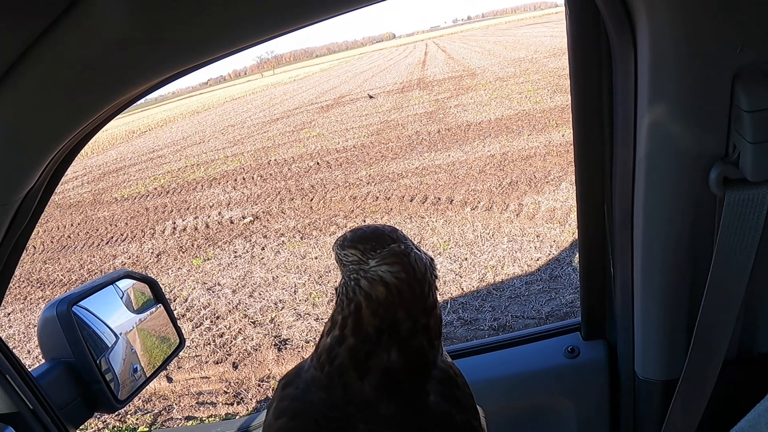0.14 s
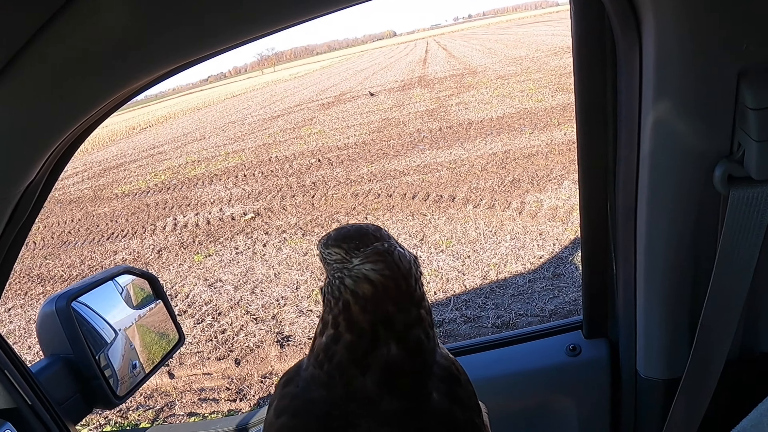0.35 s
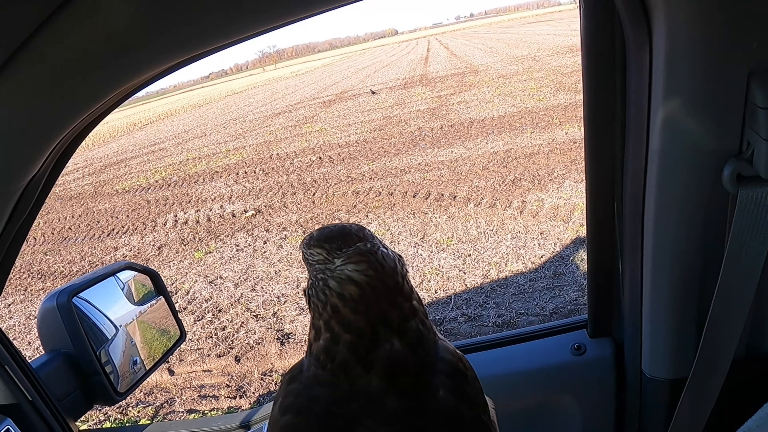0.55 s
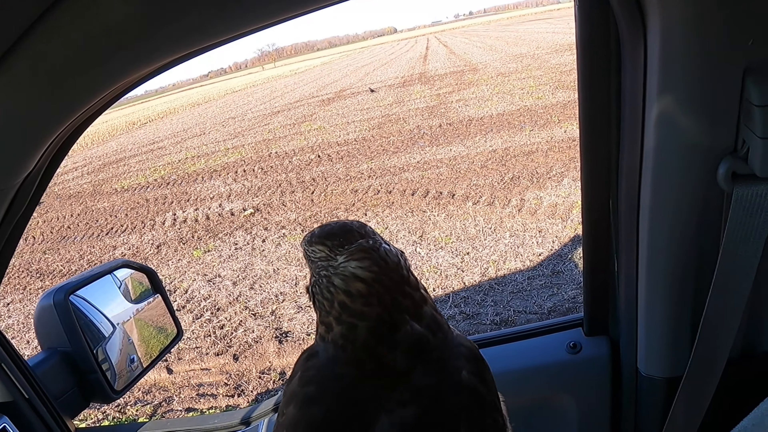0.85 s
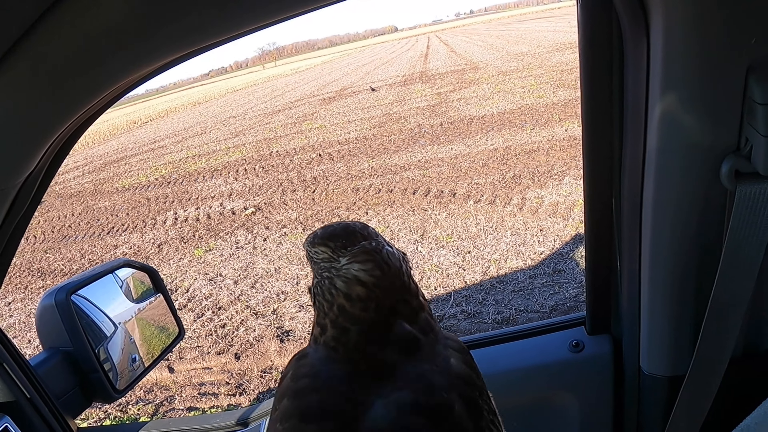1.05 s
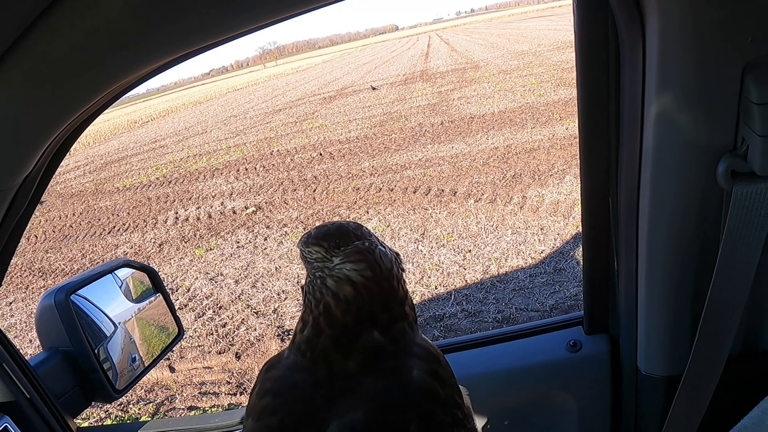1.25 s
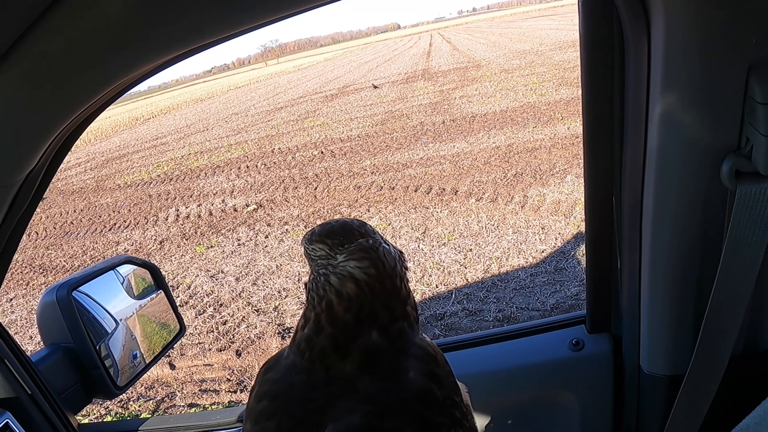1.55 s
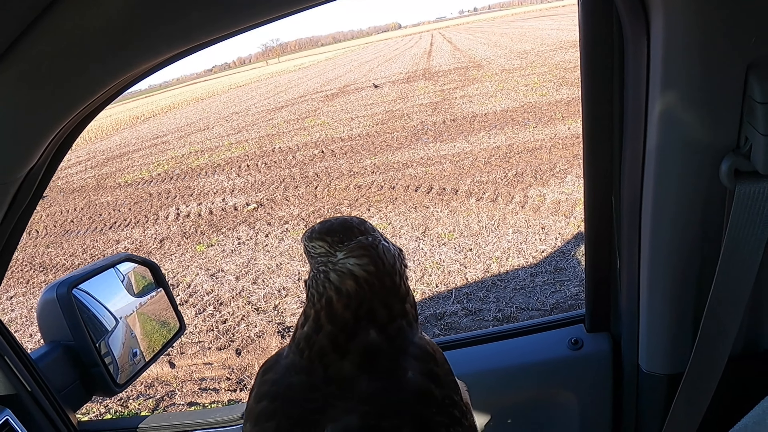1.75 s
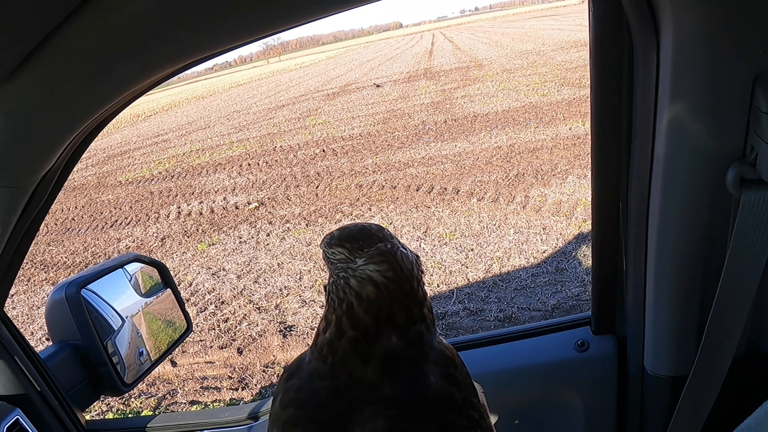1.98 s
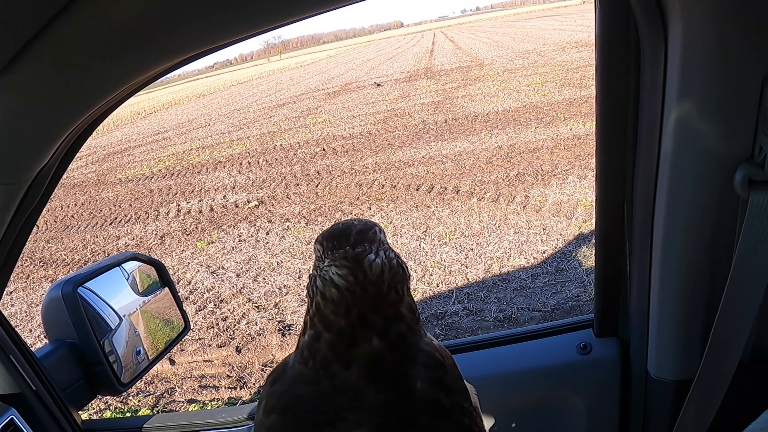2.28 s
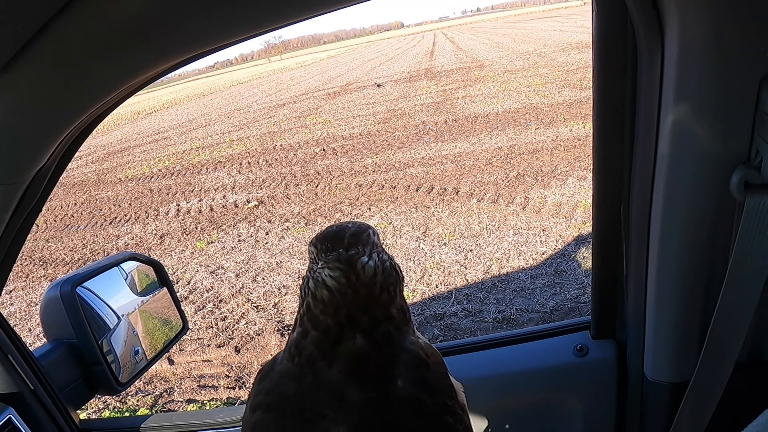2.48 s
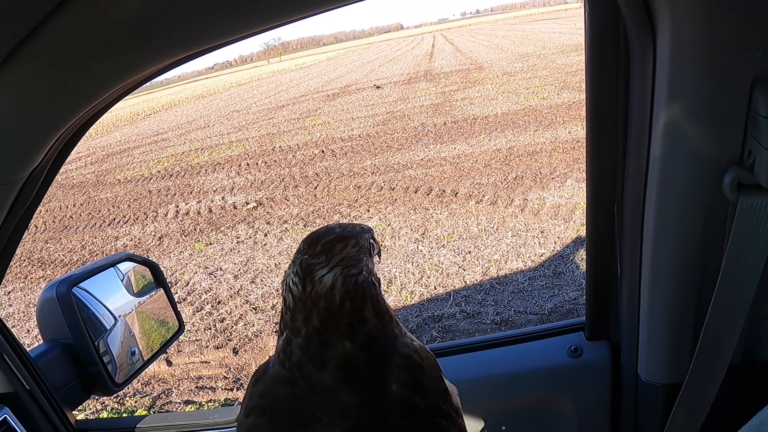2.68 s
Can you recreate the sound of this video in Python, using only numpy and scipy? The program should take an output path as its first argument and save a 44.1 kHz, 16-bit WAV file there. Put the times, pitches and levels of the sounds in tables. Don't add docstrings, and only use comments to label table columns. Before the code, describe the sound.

A small hollow bell on a hawk's leg clatters in uneven clusters as the bird shifts, with feather swishes and tiny snaps, then a sleeve rub; low idling engine rumble in a car, phone microphone close by.

```python
import sys
import numpy as np
from scipy import signal
from scipy.fft import rfft, irfft, next_fast_len
from scipy.io import wavfile
from scipy.ndimage import uniform_filter1d

SR = 44100
rng = np.random.default_rng(int(sys.argv[2]) if len(sys.argv) > 2 else 0)


def elevation(decibels):
    levels = np.asarray(decibels, float)
    return 10 ** (levels / 20)


def store_pcm(level_fs):
    pcm = np.round(np.clip(level_fs, -1, 1) * 32767).astype(np.int16)
    wavfile.write(sys.argv[1], SR, np.atleast_2d(pcm).T)


N = 124362
M = next_fast_len(N)

# pitch_hz, level_db (per Hz)
CABIN = [(12, -39), (20, -2), (65, -12.5), (87, -17.5), (192, -19.5), (304, -26.5), (338, -33.5),
         (700, -44.5), (910, -56), (1540, -120)]
# pitch_hz, level_db (per Hz)
AIR = [(350, -33), (700, 0), (1500, -9), (2600, -12.5), (4200, -22), (7400, -22.5), (9000, -33),
       (12500, -35), (15500, -66)]
# order (multiple of the engine cycle), level_db
ENGINE_ORDERS = [(5, -51.5), (6, -61), (7, -59.5), (8, -45.5), (10, -79.5), (11, -54.5), (13, -42.5),
                 (14, -57), (15, -54.5), (16, -65.5), (19, -55)]
# pitch_hz, width_hz, level_db
TRIM = [(617, 77, -73), (1192, 306, -61.5), (1936, 310, -69)]
# start_s, level_db, pitch_hz
BUMPS = [
    (.68, -33, 44.5),
    (1.42, -40, 35),
    (1.88, -35.5, 30),
    (2.28, -45, 650),
    (2.673, -40, 254),
    (3.1, -43, 130),
    (2.74, -44, 135),
    (2.436, -42, 2400),
]
# time_s, level_db, brightening_db_per_octave
DRAG = [
    (1.68, -52, 0.7),
    (1.81, -49.5, -0.3),
    (1.899, -42.5, -0.8),
    (1.97, -37, -1.1),
    (2.049, -34.5, -0.76),
    (2.15, -38, -0.24),
    (2.2, -40.5, 2.36),
    (2.238, -42.5, 2),
    (2.263, -49, -.5),
    (2.38, -57, -2.5),
]
# pitch_hz, level_db (per Hz)
SLEEVE = [(100, -9), (223, 0), (429, -15), (878, -9), (3760, -15), (7390, -23.5), (12500, -41.5),
          (15700, -63)]
# peak_s, rise_s, fall_s, level_db
RUSTLES = [(.475, 0.053, 0.088, -69.5), (.665, 0.054, 0.068, -61), (.81, 0.027, .03, -65.5),
           (.87, 0.036, 0.048, -63), (0.928, 0.019, 0.031, -59), (1.004, 0.01, 0.014, -50.5),
           (1.08, 0.082, 0.046, -63), (1.26, 0.045, 0.083, -63.5), (1.39, 0.023, 0.014, -56.5),
           (1.479, 0.049, 0.046, -51), (1.667, 0.039, 0.029, -56.5), (2.464, 0.058, 0.024, -56),
           (2.6, 0.11, 0.14, -71.5), (2.75, 0.018, 0.041, -70.5)]
# pitch_hz, level_db (per Hz)
FEATHER = [(300, -30), (900, 3), (1600, 3), (4000, -3), (7400, -7.5), (9000, -15.5), (12500, -18.5),
           (15500, -62)]
# start_s, peak_db
SNAPS = [(0.464, -57.5), (0.654, -49.5), (0.7138, -53.5), (0.8031, -54), (1.0001, -42), (1.006, -50),
         (1.0789, -48), (1.2534, -55), (1.3698, -54), (1.6631, -45), (1.7644, -49), (2.436, -59),
         (.218, -66), (.376, -63), (.43, -63), (.741, -65), (1.0695, -52), (1.711, -51), (2.366, -63),
         (2.3815, -64), (2.39, -53), (2.413, -65), (2.458, -46), (2.462, -50), (2.4742, -59), (2.484, -61),
         (2.551, -65), (2.638, -59), (2.655, -61), (2.677, -61), (2.745, -63)]
# peak_s, peak_db,
# cluster_centre_hz
KNOCKS = [(0.925, -26.5, 2850), (0.9413, -57, 2810), (0.9546, -49, 2850), (0.9735, -30.5, 2860),
          (0.9794, -41, 2747), (0.9889, -55, 2950), (0.9943, -31, 2820), (0.9993, -36, 2800),
          (1.0051, -38, 2860), (1.0119, -22.5, 2834), (1.0266, -30, 2850), (1.0413, -37, 2610),
          (1.0465, -33.5, 2886), (1.0511, -44, 2780), (1.0715, -43, 2900), (1.0847, -49, 2880),
          (1.097, -46, 2970), (1.1486, -45, 3080), (1.1883, -48, 3030), (1.2255, -42.5, 2790),
          (1.2635, -37, 2800), (1.2698, -43, 2780), (1.2927, -49, 2920), (1.3028, -40.5, 2970),
          (1.3116, -48, 2950), (1.353, -43.5, 2870), (1.36, -47.5, 2820), (1.3675, -53, 2790),
          (1.4026, -50, 2750), (1.4336, -50, 2720), (1.4384, -52, 2730), (1.4503, -60, 2990),
          (1.4615, -57, 3200), (1.4679, -31.5, 2890), (1.4732, -33.5, 2870), (1.4786, -46, 2770),
          (1.4846, -47, 2780), (1.4918, -43, 2770), (1.4984, -45, 2940), (1.5032, -45, 2930),
          (1.5085, -53, 3010), (1.5178, -55, 3010), (1.5265, -52, 3180), (1.5592, -46, 2880),
          (1.566, -46, 2945), (1.5763, -43.5, 2877), (1.5835, -65, 2800), (1.5957, -49, 2880),
          (1.6681, -54, 2970), (1.6748, -44, 2910), (1.6808, -44, 2870), (1.6893, -45, 2900),
          (1.7387, -50, 2930), (1.752, -46, 2870), (1.7583, -53, 2820),
          (0.036, -58, 3120), (0.14, -56, 3066), (0.148, -59, 3180), (0.2545, -57, 3100), (0.269, -59, 3020),
         (.335, -61.5, 3020), (0.9285, -42, 2830), (1.0182, -32, 2847), (1.03, -40, 2700),
         (1.0343, -34, 2697), (1.058, -50, 2600), (1.648, -59, 2890), (.9232, -28, 2970),
         (1.101, -52, 2980), (1.425, -50, 2850), (1.478, -47, 2540), (1.488, -52, 2520), (1.601, -53, 2800),
         (1.734, -49, 2900), (1.747, -46, 2900), (2.502, -55, 2900), (2.529, -57, 2980), (2.722, -62, 2900),
         (2.77, -58.5, 2900)]
# pitch_hz, level_db, t60_s
CLUSTER = [(2435, 0, 0.057), (2540, -9.5, 0.15), (2800, 5.5, 0.037), (2863, 0.5, 0.14), (3010, 0, 0.077),
           (3097, -12.5, 0.027), (3150, -3, 0.022), (3216, -8.5, 0.092)]
# pitch_hz, level_db, t60_s
SHELL = [(5660, -3.5, 1), (6330, -0.5, 0.43), (9840, -4, 0.27), (11280, 0, 0.19), (12600, -2, .25),
         (14200, -14, 0.34)]
# start_s, free_ring_s, level_db, brightest_hz
RINGS = [(.04, .33, -86, 5670), (.975, 0.082, -66, 5680), (.974, 0.099, -71, 11800),
         (.976, 0.06, -65, 6360), (.994, 0.045, -70, 11400), (1.009, .052, -60, 9800),
         (1.011, 0.042, -73, 14300), (1.016, 0.033, -64, 6380), (1.038, 0.015, -66, 11840),
         (1.06, .16, -73, 5650), (1.28, 0.08, -74, 5650), (1.292, 0.046, -80, 11800),
         (1.422, 0.029, -54.5, 9900), (1.424, 0.042, -58, 11830), (1.424, .1, -64, 14300),
         (1.467, 0.037, -57, 9800), (1.479, 0.024, -60.5, 11840), (1.559, 0.054, -70.5, 9800),
         (1.583, 0.026, -78, 11800)]
# pitch_hz, left_louder_db
PORTS = [(110, 2.5), (380, -.5), (1300, 1.8), (4400, 2.5), (8500, 5), (15000, 8.5)]

CABIN_DB, AIR_DB = -44, -66
CYCLE_HZ, CYCLE_START_S = 4.42, 0.12
RATTLE_PER_S = 18
SQUEAK_S, SQUEAK_LONG_S, SQUEAK_HZ, SQUEAK_OCT, SQUEAK_DB = 1.488, 0.047, 1155, 0.87, -50
TOUCH_S, FREE_DB = 0.0033, -13
REACH_HZ, RISE_S, KNOCK_DB, RING_SHARE = 131, 0.0016, -0.36, 0.55
SPREAD_OCT, DAMP_S = 0.075, 0.004
LAG_RAD, LAG_LOW_HZ, LAG_TOP_HZ = 0.85, 229, 4400
SIDES = np.array([[1], [-1]])


def table(points, hz):
    p = np.array(points, float)
    return elevation(np.interp(np.log(np.maximum(hz, 1)), np.log(p[:, 0]), p[:, 1]))


def shape(x, gain):
    pad = (M - N) // 2
    x = np.pad(x, [(0, 0)] * (x.ndim - 1) + [(pad, M - N - pad)], "linear_ramp")
    hz = np.arange(M // 2 + 1) * SR / M
    return irfft(rfft(x) * gain(hz), M)[..., pad:pad + N]


def unit(x):
    return x / np.sqrt(np.mean(x ** 2))


def walk(rate):
    k = int(SR / rate)
    steps = np.repeat(rng.standard_normal(N // k + 1), k)
    smooth = uniform_filter1d(uniform_filter1d(steps, k), k)
    return unit(smooth[:N])


def add(out, s, x):
    i = int(s * SR)
    out[i:i + len(x)] += x[:N - i]


def bands(points, flicker_db, grain_db, wide, tilt=0, octaves=range(-4, 5)):
    grain = elevation(grain_db * np.minimum(rng.exponential(size=M), 4))
    raw = rng.standard_normal((2, M)) * grain
    f = np.arange(M // 2 + 1) * SR / M
    spec = rfft(raw) * table(points, f)
    spec = spec / np.std(irfft(spec[0], M))
    octs = np.log2(np.maximum(f, 1) / 1000)
    out = 0
    for k in octaves:
        window = np.cos(np.clip(octs - k, -1, 1) * np.pi / 2) ** 2
        mid, side = irfft(spec * window, M)[:, :N]
        share = wide / (1 + (0.22 / 2 ** k) ** 2) + 0.029 * 2 ** k
        out = out + elevation(flicker_db * walk(14) + tilt * k) * (mid + share * side * SIDES)
    return out


def cabin_rumble():
    return elevation(CABIN_DB) * bands(CABIN, 2.12, 2.2, 0.54, octaves=range(-6, 1))


def window_air():
    return elevation(AIR_DB + walk(1.12)) * bands(AIR, 1.3, 1.9, 0.52)


def engine_drone(t):
    turn = 2 * np.pi * (CYCLE_HZ * (t - CYCLE_START_S) + 0.004 * walk(2))
    return sum(elevation(db + 2.8 * walk(4.27)) * np.cos(round(k) * turn) for k, db in ENGINE_ORDERS)


def trim_rattle():
    phase = np.cumsum(RATTLE_PER_S * (1 + 0.1 * walk(8))) / SR % 1
    gate = np.exp(-phase / 2.5) * elevation(0.8 * walk(11) + 1.7 * walk(5))
    mid, side = rng.standard_normal((2, N))
    buzz = gate * (mid + 0.38 * side * SIDES)
    out = 0
    for hz, width, db in TRIM:
        resonance = shape(buzz, lambda f: 1 / (1 + ((f - hz) / width * 2) ** 2))
        out = out + elevation(db) * unit(resonance)
    return out


def bumps():
    out = np.zeros(N)
    for s, db, hz in BUMPS:
        cycles = np.arange(int(8 * SR / hz)) * hz / SR
        swell = cycles * np.exp(1 - cycles / 1.17)
        add(out, s, elevation(db) * np.sin(2 * np.pi * cycles) * swell)
    return out


def sleeve(t):
    s, db, tilt = np.array(DRAG).T
    fade = np.clip((t - s[0]) / 0.078, 0, 1) * np.clip((s[-1] - t) / 0.012, 0, 1)
    cloth = bands(SLEEVE, 1.2, 1.5, 0.2, np.interp(t, s, tilt))
    return fade * elevation(np.interp(t, s, db)) * cloth


def feather_rustle(t):
    power = np.zeros(N)
    for s, rise, fall, db in RUSTLES:
        power += elevation(2 * db) * np.exp(-((t - s) / np.where(t < s, rise, fall)) ** 2)
    return elevation(1.0) * np.sqrt(power) * bands(FEATHER, 1.5, 3.2, 0.22)


def quill_snaps():
    out, u = np.zeros(N), np.arange(400) / SR
    for s, db in SNAPS:
        noise = rng.standard_normal(len(u))
        add(out, s, elevation(db + 9) * (np.sign(noise) + 0.5 * noise) * np.exp(-u / 0.00015))
    return shape(out, lambda f: f ** 2 / (f ** 2 + 1800.0 ** 2) / (1 + (f / 9500.0) ** 8))


def quill_squeak(t):
    along = np.clip((t - SQUEAK_S) / SQUEAK_LONG_S, 0, 1)
    hz = SQUEAK_HZ * 2 ** (SQUEAK_OCT * along ** 1.7) * (1 + 0.0484 * walk(250))
    turn = 2 * np.pi * np.cumsum(hz) / SR
    return elevation(SQUEAK_DB + 2.7 * walk(200)) * np.sin(np.pi * along) * np.sin(turn)


def bell_shell():
    out, t = np.zeros(N), np.arange(SR // 3) / SR
    hz, db, t60 = np.array(SHELL).T[:, :, None]
    beat = 1 + 0.34 * np.cos(2 * np.pi * hz * 0.009 * t) + 0.23 * np.cos(2 * np.pi * hz * 0.0041 * t + 2)
    partials = beat * np.sin(2 * np.pi * hz * t) * elevation(-60 * t / t60)
    for s, free, level_db, top in RINGS:
        gain = elevation(db + level_db + 8) * np.exp(-0.5 * (np.log2(hz / top) / SPREAD_OCT) ** 2)
        damping = np.exp(-np.maximum(t - free, 0) / DAMP_S)
        add(out, s, (gain * partials).sum(0) * damping * (1 - np.exp(-t / 0.00086)))
    return out


def bell_knocks():
    out, t = np.zeros(N), np.arange(SR // 3) / SR
    hz, db, t60 = np.array(CLUSTER).T[:, :, None]
    onset = 1 - np.exp(-(t / RISE_S) ** 2)
    mute = elevation(FREE_DB) + np.exp(-(t / TOUCH_S) ** 2)
    decay = elevation(-60 * t / t60 / RING_SHARE)
    for s, peak, mid in KNOCKS:
        chance = rng.standard_normal((len(CLUSTER), 2))
        gain = elevation(db + 3.8 * chance[:, :1]) * np.exp(-0.5 * ((hz - mid) / REACH_HZ) ** 2)
        modes = gain * np.sin(2 * np.pi * hz * t + 0.36 * chance[:, 1:]) * decay
        x = modes.sum(0) * onset * mute
        loudest = np.abs(x).argmax()
        add(out, s - loudest / SR, elevation(peak + KNOCK_DB) * x / np.abs(x[loudest]))
    return out


def cabin_echo(ring):
    u = np.arange(3000) / SR
    tail = rng.standard_normal((2, len(u))) * elevation(-60 * u / 0.068) * elevation(-30) * (u > 0.002)
    return signal.fftconvolve(ring[None], tail)[:, :N]


def scene():
    t = np.arange(N) / SR
    car = cabin_rumble() + window_air() + engine_drone(t) + trim_rattle()
    arm = bumps() + sleeve(t)
    feathers = feather_rustle(t) + quill_snaps() + quill_squeak(t)
    bell = bell_shell() + bell_knocks()
    return car + arm + feathers + bell + cabin_echo(bell)


def band_limit(x):
    return signal.sosfilt(signal.butter(12, 15610, fs=SR, output="sos"), x)


def record(dry):
    half = SIDES / 2

    def lag(f):
        return LAG_RAD * f ** 2 / (f ** 2 + LAG_LOW_HZ ** 2) / (1 + (f / LAG_TOP_HZ) ** 4)

    mix = shape(dry, lambda f: table(PORTS, f) ** half * np.exp(-1j * half * lag(f)))
    return band_limit(mix)


dry = scene()
out = record(dry)
store_pcm(out)
```